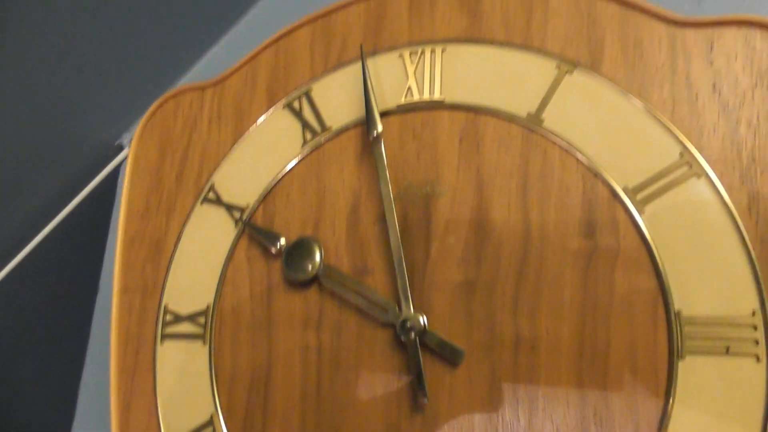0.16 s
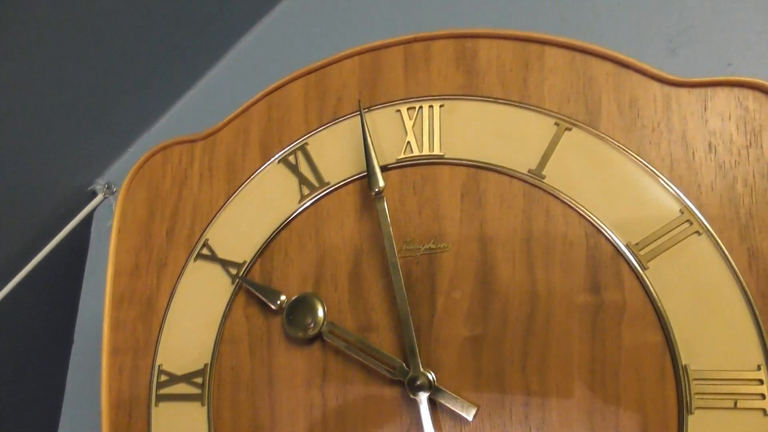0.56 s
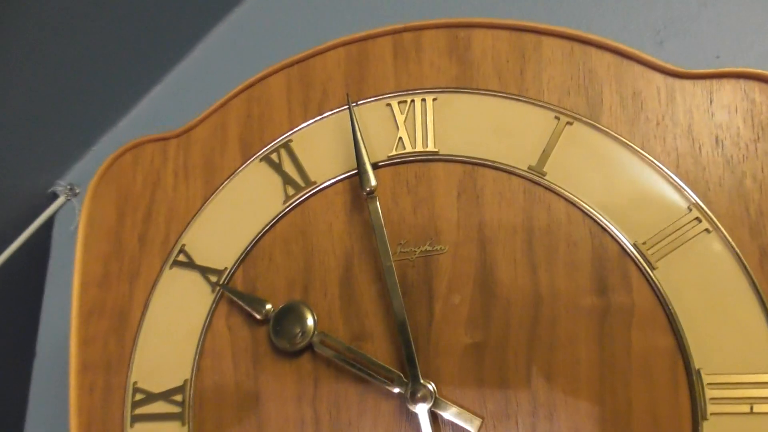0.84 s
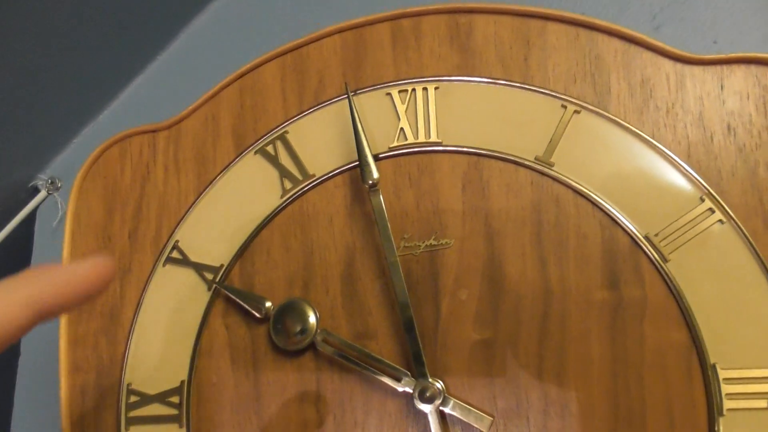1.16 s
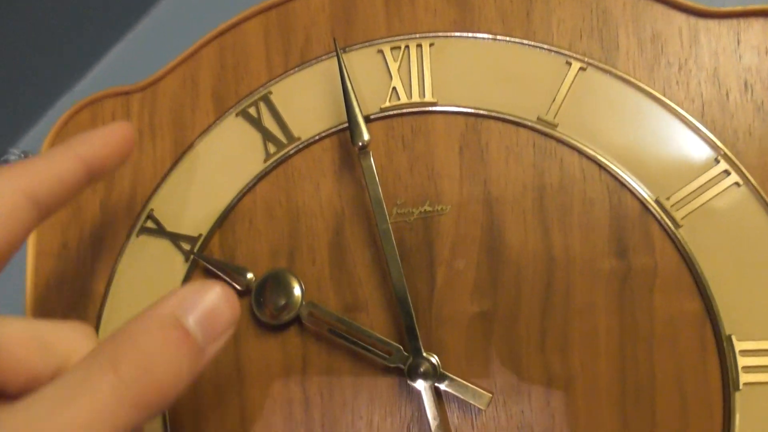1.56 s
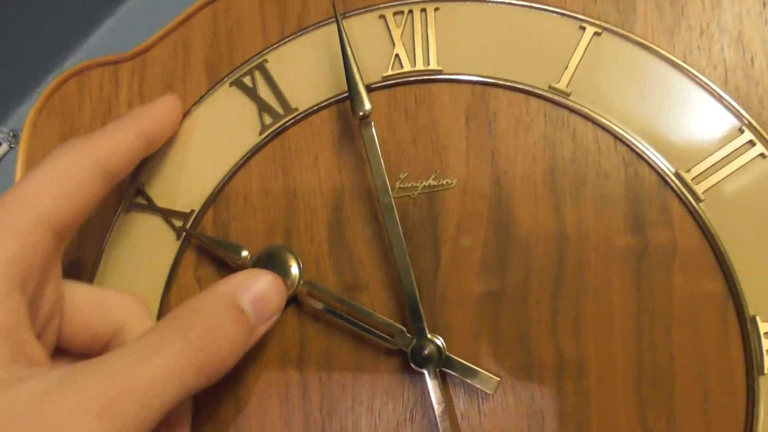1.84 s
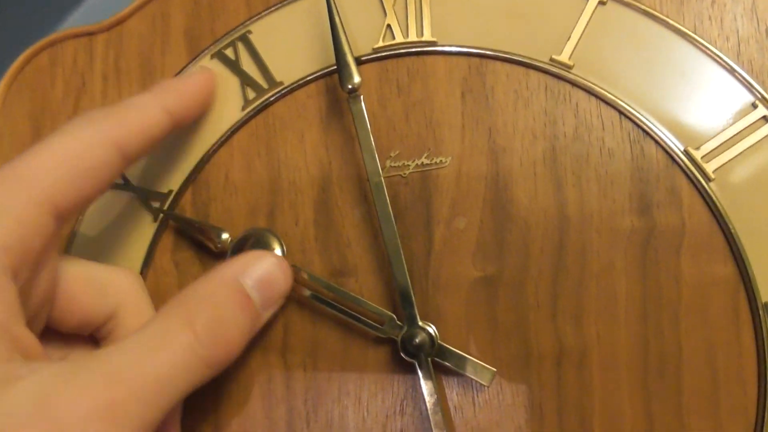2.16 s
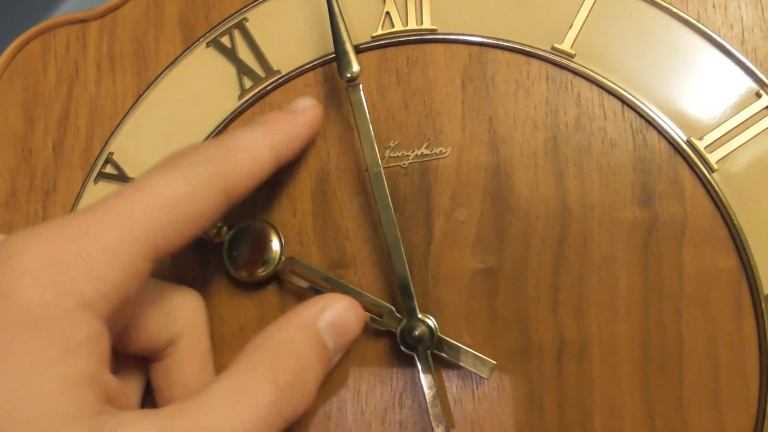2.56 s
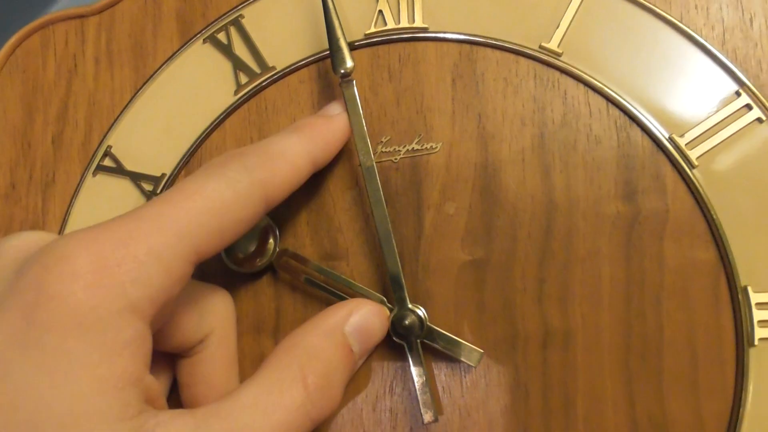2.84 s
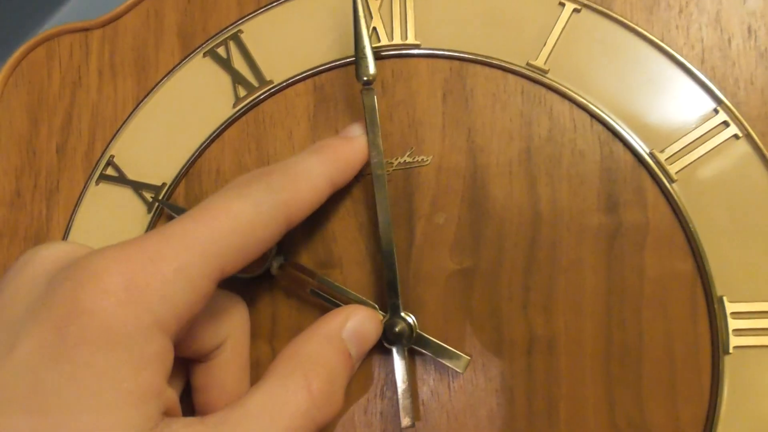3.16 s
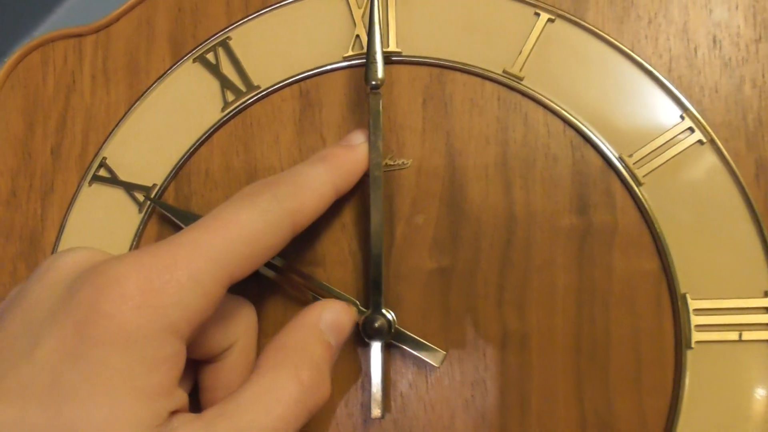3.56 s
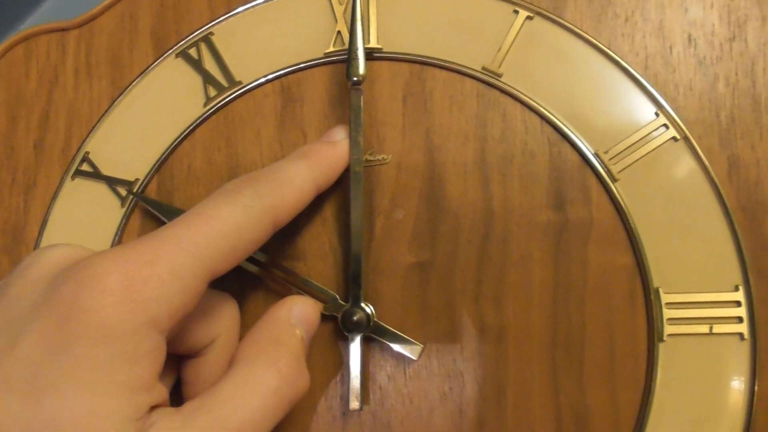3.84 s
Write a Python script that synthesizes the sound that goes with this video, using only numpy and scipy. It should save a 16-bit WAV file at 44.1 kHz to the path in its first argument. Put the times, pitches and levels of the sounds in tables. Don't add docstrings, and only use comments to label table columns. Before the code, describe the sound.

Clock ticking slowly up close, faint finger taps, then loud mechanical clacks and a short gear whirr.

```python
import sys
import numpy as np
from scipy import signal
from scipy.fft import rfft, irfft, next_fast_len
from scipy.io import wavfile
from scipy.ndimage import map_coordinates

SR = 44100
rng = np.random.default_rng(int(sys.argv[2]) if len(sys.argv) > 2 else 0)


def invert_db(level):
    return 10 ** (np.asarray(level, dtype=float) / 20)


def file_out(sig):
    cols = np.atleast_2d(sig).T
    lim = np.clip(cols, -1, 1)
    pcm = np.round(lim * 32767).astype(np.int16)
    wavfile.write(sys.argv[1], SR, pcm)


N = 176400

# mode_hz, level_db, t60_s
TAP_MODES = [(277.6, 0, 0.21), (332, -3, 0.3), (584, -20.5, 0.057), (973, -6.5, 0.033),
             (2230, -14.5, 0.045)]
# mode_hz, level_db, t60_s
PIP_MODES = [(754, 0.5, 0.065), (806, 7, 0.026)]


def unit(x):
    return x / np.sqrt(np.mean(x ** 2) + 1e-20)


def along(points, hz):
    f, v = np.transpose(points)
    return np.interp(np.log(hz + 1), np.log(f + 1), v, left=v[0], right=v[-1])


def wobble(rate_hz):
    knots = rng.standard_normal(int(N * rate_hz / SR) + 4)
    return map_coordinates(knots, [np.arange(N) * rate_hz / SR])


def filtered(x, response):
    n = x.shape[-1]
    m = next_fast_len(n + 8192)
    return irfft(rfft(x, m) * response(np.fft.rfftfreq(m, 1 / SR)), m)[..., :n]


def resonant(peaks):
    def response(f):
        total = 0
        for k, (center, width, db) in enumerate(peaks):
            band = 1j * f * width
            total = total + (-1) ** k * invert_db(db) * band / (center * center - f * f + band)
        return total
    return response


def grains(per_s, spread_db, smooth):
    size = invert_db(spread_db * rng.exponential(size=N))
    clicks = (rng.random(N) < per_s / SR) * size * rng.standard_normal(N)
    return unit(unit(clicks) + smooth * rng.standard_normal(N))


def swells(rows, bend):
    t = np.arange(N) / SR
    total = 0
    for start, rise, fall, db in rows:
        ramp = np.interp(t, [start, start + rise, start + rise + fall], [0, 1, 0])
        total = total + invert_db(db) * ramp ** bend
    return total


def rush(spectrum, alike):
    def mid_side(hz):
        inside = (hz > spectrum[0][0]) & (hz < spectrum[-1][0])
        turn = np.arccos(np.clip(along(alike, hz), -1, 1)) / 2
        return inside * invert_db(along(spectrum, hz)) * [np.cos(turn), np.sin(turn)]
    mid, side = filtered(rng.standard_normal((2, N)), mid_side)
    return unit(np.array([mid + side, mid - side]))


def walls(x, alike):
    # pitch_hz, t60_s
    decay = [(200, 0.3), (1000, 0.21), (14000, 0.06)]
    hz, t, z = signal.stft(rng.standard_normal((2, SR // 3)), SR, nperseg=256)
    fade = invert_db(-60 * t / along(decay, hz)[:, None])
    tail = signal.istft(z * fade, SR, nperseg=256)[1]
    side = np.sqrt(1 - np.clip(alike, 0, 1))
    tail = tail[0] + side * np.array([tail[1], -tail[1]])
    tail = tail / np.linalg.norm(tail[0])
    late = np.pad(x, (130, 0))[None]
    return signal.fftconvolve(late, tail, axes=1)[:, :len(x)]


def strikes(events, modes, attack_s, crack_db, crack_s, wet_db, rough, low_hz, held_s=9):
    # pitch_hz, level_db
    crack_color = [(800, 17.5), (1250, 8.5), (1700, -7.5), (2200, 3), (5000, -7), (7500, 0.5), (12000, -9),
                   (16000, -7)]
    waver_cycles, mute_s = 12.46, 0.0047
    out, t = np.zeros((2, N + SR)), np.arange(SR // 2) / SR
    hz, level, t60 = np.transpose(modes)[:, :, None]

    def crack_response(f):
        return invert_db(along(crack_color, f)) / (1 + (low_hz / (f + 1)) ** 4)

    for s, db in events:
        knots = rng.standard_normal((len(modes), 600))
        drift = np.array([np.interp(t * f / waver_cycles, np.arange(len(k)), k - k[0])
                          for f, k in zip(hz, knots)])
        phase = 2 * np.pi * hz * t + rough * np.clip(hz / 1000, 0, 1.2) ** 2 * drift
        ring = (invert_db(level - 60 * t / t60) * np.sin(phase)).sum(0)
        noise = unit(filtered(rng.standard_normal(len(t)), crack_response))
        crack = invert_db(crack_db - 60 * t / crack_s) * noise
        hit = invert_db(db) * (1 - np.exp(-t / attack_s)) * (ring + crack)
        hit = hit * np.exp(-np.clip(t - held_s, 0, None) / mute_s)
        out[:, round(s * SR):][:, :len(t)] += hit + invert_db(wet_db) * walls(hit, 0.89)
    return out[:, :N]


def near_clock():
    # start_s, peak_db
    ticks = [(0.392, -36), (1.672, -36), (2.946, -31)]
    # start_s, peak_db
    tocks = [(1.04, -30), (2.315, -29.5), (3.592, -27.5)]
    # mode_hz, level_db, t60_s
    tick_modes = [(606, -18, 0.21), (900, 3.5, 0.044), (1030, -0.5, 0.02), (1195, -13, 0.081),
                  (2074, 0, 0.013), (2500, -17, 0.17), (3790, -12, 0.042), (6700, 9.5, 0.0092),
                  (6980, 8, 0.019), (7150, -28, 0.018), (7870, 6.5, 0.019), (10300, -14, 0.02),
                  (10920, 4, 0.019)]
    # mode_hz, level_db, t60_s
    tock_modes = [(638, -15.5, 0.055), (784, 0.5, 0.064), (967, -14.5, 0.14), (1270, -86, 0.076),
                  (1977, -21, 0.079), (6300, -15, 0.049), (6850, 0.5, 0.016), (10250, 4.5, 0.016),
                  (10700, 3, 0.014)]
    odd = strikes(ticks, tick_modes, attack_s=0.00068, crack_db=0.66, crack_s=0.036,
                  wet_db=-6, rough=1.0, low_hz=450)
    even = strikes(tocks, tock_modes, attack_s=0.0011, crack_db=0, crack_s=0.06,
                   wet_db=-10.5, rough=0.99, low_hz=510)
    return invert_db(-9) * odd + invert_db(-13.0) * even


def case_knock():
    # start_s, peak_db
    knock = [(3.196, -28.5)]
    # start_s, peak_db
    edges_hit = [
        (3.195, -20.5),
        (3.2475, -41),
        (3.2612, -42.5),
    ]
    # mode_hz, level_db, t60_s
    case_modes = [(283, 2, 0.22), (329, -3, 0.12), (430, -28, .3), (549, -8, .1), (620, -6, 0.06),
                  (705, -2, 0.07), (820, 0, .03), (940, 13, 0.018), (1125, -12, .06), (1325, -7, 0.05),
                  (2040, 3, 0.018)]
    # mode_hz, level_db, t60_s
    edge_modes = [(4930, -8, 0.019), (6930, -22, 0.031), (9680, 6, 0.018)]
    wood = strikes(knock, case_modes, attack_s=0.0014, crack_db=11, crack_s=0.012,
                   wet_db=-9.5, rough=0.99, low_hz=320)
    edge = strikes(edges_hit, edge_modes, attack_s=0.0021, crack_db=4.8, crack_s=0.021,
                   wet_db=-11.5, rough=0.84, low_hz=4300)
    return wood + edge


def lever():
    # start_s, peak_db
    lift = [(3.502, -53), (3.508, -46), (3.517, -45.5)]
    # start_s, peak_db
    plate_hits = [(3.248, -65), (3.262, -36.5), (3.548, -31), (3.555, -43), (3.562, -31), (3.570, -42.5),
                  (3.579, -44), (3.595, -50), (3.759, -47)]
    # mode_hz, level_db, t60_s
    plate_modes = [(328, -11, 0.093), (574, -11, 0.084), (720, -3, 0.016), (826, 0.5, 0.024),
                   (1007, 0, 0.019), (1240, -9.5, 0.062), (2130, -12, 0.022)]
    # start_s, peak_db
    glance = [(3.523, -27.5)]
    # mode_hz, level_db, t60_s
    glance_modes = [(600, -12, 0.026), (1470, 1.5, 0.024), (2050, 3, 0.012), (2560, -11, 0.012)]
    # start_s, peak_db
    sing = [(3.527, -24.5)]
    # mode_hz, level_db, t60_s
    sing_modes = [(373, -18.5, 0.088), (927, 2, 0.19), (1340, -16.5, .15), (1820, -16, 0.074),
                  (2170, -27, .15)]
    lifting = strikes(lift, PIP_MODES, attack_s=0.0017, crack_db=-30, crack_s=0.008,
                      wet_db=1, rough=0.4, low_hz=500)
    knocks = strikes(plate_hits, plate_modes, attack_s=0.00057, crack_db=-38, crack_s=0.01,
                     wet_db=-8.5, rough=1.0, low_hz=300)
    glancing = strikes(glance, glance_modes, attack_s=0.0017, crack_db=-10, crack_s=0.01,
                       wet_db=-6.5, rough=0.34, low_hz=600)
    singing = strikes(sing, sing_modes, attack_s=0.00053, crack_db=-30, crack_s=0.01,
                      wet_db=-19, rough=0.1, low_hz=300, held_s=0.015)
    return lifting + knocks + glancing + singing


def spring_and_pawl():
    # start_s, peak_db
    release = [(3.525, -33.5)]
    # mode_hz, level_db, t60_s
    spring_modes = [(5600, -5, 0.05), (8670, -13, 0.04), (10500, -10, .015), (11800, -12, 0.012),
                    (15200, -12, .04)]
    # start_s, peak_db
    snaps = [
        (3.5412, -26),
        (3.562, -37.5),
        (3.574, -42),
        (3.766, -63),
    ]
    # mode_hz, level_db, t60_s
    pawl_modes = [(6550, -1, 0.03), (7140, -0.5, 0.025), (9430, 7, 0.012), (11120, 10, 0.0083)]
    spring = strikes(release, spring_modes, attack_s=0.00033, crack_db=3.6, crack_s=0.0083,
                     wet_db=-1.3, rough=0.24, low_hz=2500)
    pawl = strikes(snaps, pawl_modes, attack_s=0.00039, crack_db=8.6, crack_s=0.018,
                   wet_db=-15.5, rough=1.0, low_hz=4880)
    return spring + pawl


def strike_train():
    # start_s, level_db
    effort_curve = [(3.602, -58), (3.628, -58.5), (4.0, -53)]
    # pitch_hz, width_hz, level_db
    gear_peaks = [(314, 460, -6), (597, 48, 4.5), (804, 116, -3), (1125, 126, -1), (1400, 90, -12),
                  (2300, 140, -20)]
    # pitch_hz, width_hz, level_db
    jingle_peaks = [(3370, 310, 0.5), (4450, 220, 0.5), (5690, 850, -4.5), (7300, 890, -1), (8150, 560, 0),
                    (9950, 900, 0), (12700, 3100, -6.5), (16000, 750, 4.5)]
    # start_s, peak_db
    pinion = [(3.6487, -43), (3.6694, -54), (3.683, -51), (3.699, -48), (3.712, -45), (3.7235, -49),
              (3.7474, -56), (3.7644, -57), (3.769, -48), (3.7824, -54), (3.7974, -53), (3.8064, -50),
              (3.8472, -56), (3.8564, -51), (3.8774, -48), (3.888, -51), (3.8994, -58), (3.9095, -55),
              (3.919, -48), (3.9504, -50), (3.964, -55), (3.972, -47), (3.9864, -53)]
    click_share, click_s, jingle_db = 2.2, 0.0035, -10
    s, db = np.transpose(effort_curve)
    effort = invert_db(np.interp(np.arange(N) / SR, s, db)) * (np.arange(N) > s[0] * SR)
    teeth = unit(filtered(grains(per_s=460, spread_db=0.5, smooth=1.0), resonant(gear_peaks)))
    at, size_db = np.transpose(pinion)
    clicks = np.zeros(N)
    clicks[(at * SR).astype(int)] = invert_db(size_db - size_db.mean())
    gate = 1 + click_share * signal.lfilter([1], [1, -np.exp(-1 / (click_s * SR))], clicks)
    jingle = unit(filtered(gate * rng.standard_normal(N), resonant(jingle_peaks)))
    whirr = effort * (teeth + invert_db(jingle_db) * jingle)
    return whirr + invert_db(-8.5) * walls(whirr, 0.93)


def rattle():
    # start_s, rise_s, fall_s, level_db
    buzzes = [
        (3.197, .004, 0.067, -54),
        (3.245, 0.013, 0.055, -57.5),
        (3.53, 0.0086, 0.11, -49),
    ]
    # pitch_hz, level_db
    loose = [(900, 6), (1700, -7), (2500, -4), (5000, 0), (7000, 5.5), (10000, 1.5), (15500, -15)]
    parts = filtered(grains(per_s=2500, spread_db=1.5, smooth=0.69),
                     lambda hz: (hz > 500) * invert_db(along(loose, hz)))
    buzz = swells(buzzes, 1.58) * unit(parts)
    return buzz + invert_db(3) * walls(buzz, 1.0)


def fingertip():
    # start_s, peak_db
    taps = [(1.9, -56.5), (2.34, -56.5), (2.815, -52), (3.023, -56)]
    # start_s, peak_db
    press = [(2.757, -44.5)]
    free = strikes(taps, TAP_MODES, attack_s=0.00051, crack_db=-10.0, crack_s=0.045,
                   wet_db=-4, rough=0.22, low_hz=360)
    muted = strikes(press, TAP_MODES, attack_s=0.00059, crack_db=-7, crack_s=0.031,
                    wet_db=-8, rough=0.17, low_hz=300, held_s=0.028)
    return free + muted


def creaks():
    # start_s, peak_db
    pips = [(0.912, -68), (1.823, -65), (3.021, -61.5), (3.113, -66.5), (3.135, -65.5)]
    return strikes(pips, PIP_MODES, attack_s=0.0003, crack_db=9.5, crack_s=0.024,
                   wet_db=-2, rough=0.5, low_hz=540)


def brush():
    # start_s, rise_s, fall_s, level_db
    strokes = [(-.05, 0.056, 0.23, -72), (0.399, 0.055, .12, -67), (1.82, 0.012, 0.083, -68),
               (2.2, 0.14, 0.075, -70), (2.458, .03, 0.0089, -65), (2.59, 0.02, 0.035, -66),
               (2.76, 0.02, 0.048, -71.5)]
    # pitch_hz, level_db
    skin = [(400, -3), (900, -2), (2000, -18), (3900, -5), (5200, -11), (7000, -1), (8100, -1),
            (15000, -13)]
    cloth = filtered(grains(per_s=900, spread_db=1.2, smooth=0.67), lambda hz: invert_db(along(skin, hz)))
    rub = swells(strokes, 0.45) * invert_db(1) * unit(cloth)
    return rub + invert_db(0.5) * walls(rub, 0.96)


def grip():
    # start_s, rise_s, fall_s, level_db
    shifts = [(-.02, .07, 0.15, -60.5), (.4, 0.091, 0.15, -61.5), (1.82, 0.07, .12, -64.5)]
    # pitch_hz, level_db
    palm = [(120, -1), (200, 7.5), (350, -4.5), (600, -2), (1200, -8.5), (2200, -33)]
    return swells(shifts, 0.4) * invert_db(1.4 * wobble(38.5)) * rush(palm, [(100, 0.86)])


def far_clock():
    # start_s, peak_db
    high_beats = [(0.001, -59.5), (1.0215, -51), (2.0911, -50.5), (3.1573, -49.5)]
    # start_s, peak_db
    low_beats = [(0.504, -58), (1.572, -58.5), (2.637, -58.5), (3.706, -59)]
    # mode_hz, level_db, t60_s
    high_modes = [(1078, -4, 0.038), (2176, -13, 0.081), (3330, -8, .04), (3636, 1, 0.033)]
    # mode_hz, level_db, t60_s
    low_modes = [(1092, 7, 0.051), (1183, -10.5, 0.15), (2160, -5.5, 0.081), (2565, -10, 0.12),
                 (3388, -2, 0.1), (4130, -3.5, 0.073)]
    high = strikes(high_beats, high_modes, attack_s=0.0012, crack_db=-8.0, crack_s=0.12,
                   wet_db=2, rough=0.12, low_hz=420)
    low = strikes(low_beats, low_modes, attack_s=0.00064, crack_db=-7.0, crack_s=0.52,
                  wet_db=-4.5, rough=0.12, low_hz=770)
    return invert_db(-4.5) * high + invert_db(0.0) * low


def room():
    # pitch_hz, level_db
    rumble_color = [(20, -11), (60, -5.5), (150, -4), (230, -8.5), (640, -12), (1900, -31.5)]
    # pitch_hz, level_db
    hiss_color = [(1600, -25), (2000, 1.5), (2500, -13), (3600, -10.5), (5100, -17.5), (6400, -9.5),
                  (8000, -5), (16000, -8)]
    # pitch_hz, likeness (0 to 1)
    likeness = [(60, 0.17), (240, 0.01), (950, 0.21), (3770, 0.96), (15000, 0.45)]
    hum_hz, hum_db = 49.3, -67.5
    beat_hz, beat_peak_s, beat_depth = 0.71, 0.49, 0.76
    drone_hz, drone_width_hz, drone_db = 185.5, 3.8, -69.5
    t = np.arange(N) / SR
    beat = 1 + beat_depth * np.cos(2 * np.pi * beat_hz * (t - beat_peak_s))
    hum = invert_db(hum_db) * beat * np.sin(2 * np.pi * hum_hz * t)
    drone = unit(filtered(rng.standard_normal(N),
                          lambda hz: 1 / (1 + ((hz - drone_hz) / drone_width_hz) ** 2)))
    drone = invert_db(drone_db) * drone * invert_db([[1.5], [-1.5]])
    rumble = invert_db(-64 + 0.093 * wobble(16.0)) * rush(rumble_color, likeness)
    hiss = invert_db(-71) * rush(hiss_color, likeness)
    return hum + drone + rumble + hiss


def scene():
    # pitch_hz, left_lead_rad
    port_lead = [(7500, 0), (10000, 1.15), (16000, 1.3)]
    # pitch_hz, left_over_right_db
    port_tilt = [(300, 3), (900, 0.8), (9500, 0.5), (12500, 1.5)]

    def ports(hz):
        half = np.array([[0.5], [-0.5]])
        return invert_db(along(port_tilt, hz) * half) * np.exp(1j * along(port_lead, hz) * half)

    clocks = near_clock() + far_clock()
    movement = case_knock() + lever() + spring_and_pawl() + strike_train() + rattle()
    hand = fingertip() + creaks() + brush() + grip()
    return filtered(clocks + movement + hand, ports) + room()


def roll_off(x):
    return signal.sosfilt(signal.butter(12, 16670, fs=SR, output="sos"), x)


def record(dry):
    top_hz, edge_hz, over_db = 15900, 140, -34
    mix = filtered(dry, lambda hz: invert_db(over_db * (1 + np.tanh((hz - top_hz) / edge_hz)) / 2))
    return roll_off(mix)


dry = scene()
out = record(dry)
file_out(out)
```